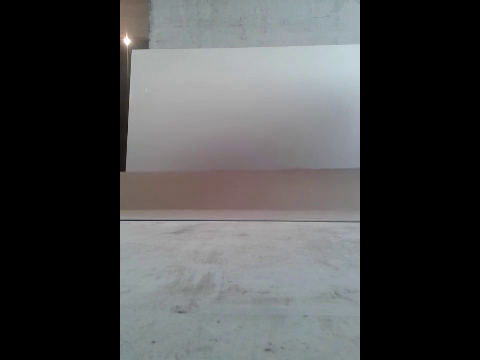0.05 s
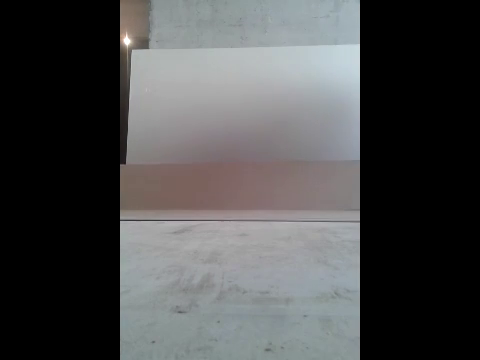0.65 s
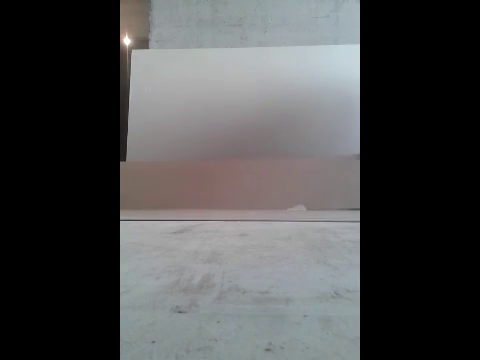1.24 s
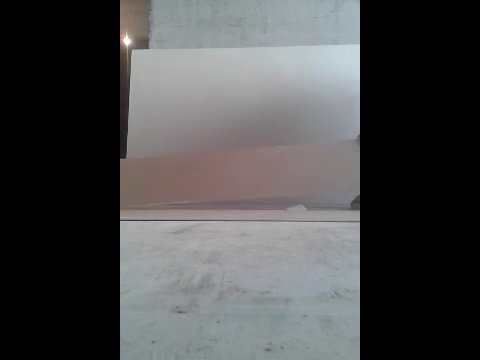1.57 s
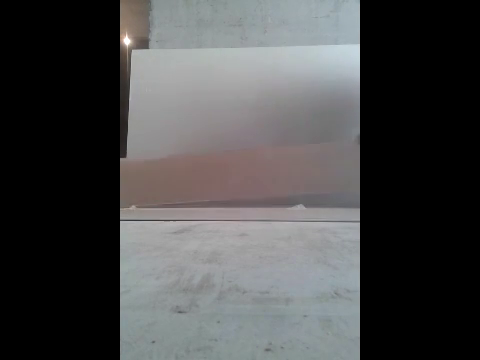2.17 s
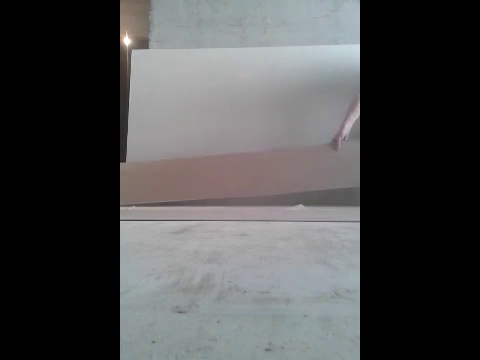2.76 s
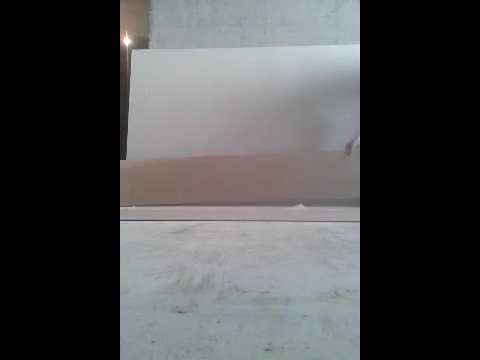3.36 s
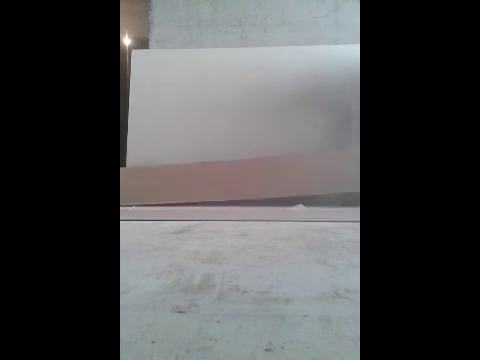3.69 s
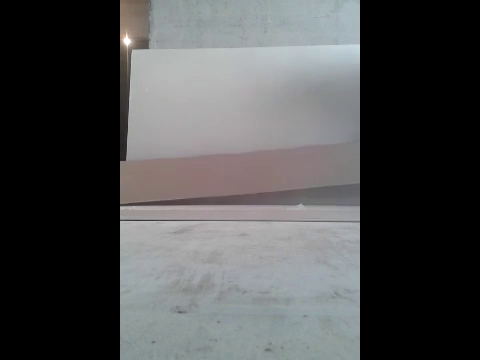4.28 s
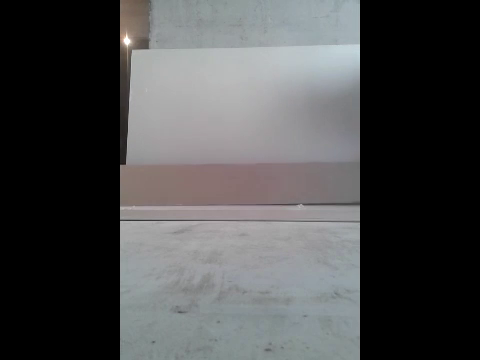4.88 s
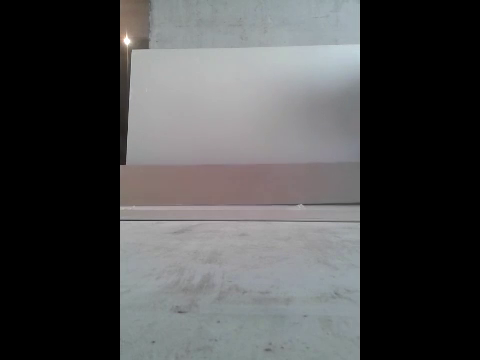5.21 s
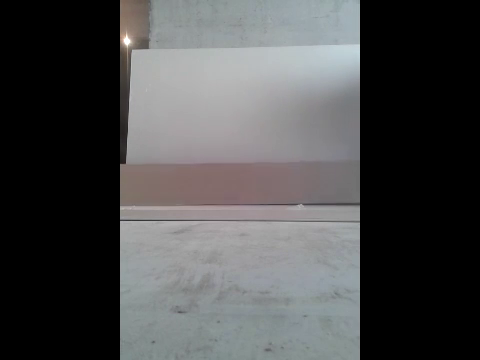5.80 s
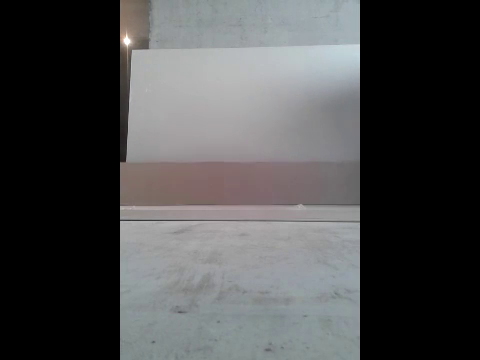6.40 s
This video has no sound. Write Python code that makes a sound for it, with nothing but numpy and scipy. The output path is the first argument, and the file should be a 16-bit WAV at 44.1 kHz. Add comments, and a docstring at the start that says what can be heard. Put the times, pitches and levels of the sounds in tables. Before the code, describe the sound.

A long plasterboard strip is shifted in a bare room, its chalky edge scraping in uneven bursts with crumbly knocks and hollow drumming. One longer, louder drag groans and gives a high squeak. A hand swishes sharply across the paper face, and softer scrapes follow. Finally the strip is pushed against a larger sheet, which booms low, chatters and rattles. The room adds a short echo.

```python
"""A chalky scrape and the swish of a hand on paper: a long plasterboard strip is lifted in a bare room.
Its edge grinds in bursts that ring and drum the strip, and its corners knock and crumble. In one long
drag the bending modes groan and gypsum squeaks on gypsum. At last the strip is pushed home against
a larger sheet, which booms, chatters and rattles as the two stick and slip."""
import sys
import numpy as np
from scipy import signal
from scipy.fft import rfft, irfft
from scipy.io import wavfile
from scipy.ndimage import uniform_filter1d

SR = 44100
rng = np.random.default_rng(int(sys.argv[2]) if len(sys.argv) > 2 else 0)


def inscribe(sig):
    """Save sig as 16-bit PCM at rate SR to the path in sys.argv[1].

    A 1-D sig is mono; a 2-D sig holds one channel per row.
    Samples are clipped to [-1, 1] before scaling.
    """
    pcm = np.round(np.clip(np.atleast_2d(sig).T, -1, 1) * 32767)
    wavfile.write(sys.argv[1], SR, pcm.astype(np.int16))


N = 288414


def undb(db):
    """Decibels to gain."""
    return 10 ** (np.asarray(db) / 20)


def unit(x):
    """Scale to rms 1."""
    return x / np.sqrt(np.mean(x ** 2))


def colour(x, eq):
    """Minimum-phase EQ through (Hz, dB) points; white input keeps its power."""
    size = 4096
    hz, db = np.transpose(eq)
    bins = np.fft.rfftfreq(size, 1 / SR)
    gain = unit(undb(np.interp(np.log(bins + 1), np.log(hz), db)))
    cepstrum = irfft(np.log(gain))
    cepstrum[1:size // 2] *= 2
    cepstrum[size // 2 + 1:] = 0
    return signal.oaconvolve(x, irfft(np.exp(rfft(cepstrum))))[:len(x)]


def resonate(x, hz, width):
    """One resonance, gain 1 at its centre."""
    return signal.lfilter(*signal.iirpeak(min(hz, .45 * SR), hz / width, fs=SR), x)


def modes(x, table, lock):
    """A body's resonances driven together, at rms 1; friction evens out each swing by lock (0-1)."""
    out = 0
    for hz, width, db in table:
        ring = resonate(x, hz, width)
        power = uniform_filter1d(ring ** 2, int(SR / width)).clip(min=0)
        swing = np.sqrt(power) + np.std(ring) / 10
        out = out + undb(db) * unit(ring / swing ** lock)
    return unit(out)


def wander(hz):
    """Smooth random modulation at rms 1."""
    step = max(int(SR / hz), 2)
    held = rng.standard_normal(N)[np.arange(N) // step]
    return unit(uniform_filter1d(uniform_filter1d(held, step), step))


def grit(per_s, spread_db, catch_db, catch_hz):
    """Tiny slips of uneven size, surging where the surface catches and lets go."""
    slips = (rng.random(N) < per_s / SR) * np.sign(rng.standard_normal(N))
    sizes = undb(spread_db * rng.standard_normal(N).clip(-2, 2))
    catching = undb(catch_db * wander(catch_hz).clip(-2, 2))
    return unit(slips * sizes * catching)


def swell(start, hold, rise, fall):
    """Envelope of a move: it rises to full strength at start, holds and dies away."""
    t = np.arange(N) / SR
    return np.exp(-np.maximum((start - t) / rise, (t - start - hold) / fall).clip(0, 20))


def blend(swells, db):
    """Gain of overlapping moves, each at its own level: their powers add."""
    return np.sqrt(undb(db) ** 2 @ swells ** 2)


def strip_low_cut(x):
    """A narrow strip radiates next to nothing below its first mode."""
    return signal.sosfilt(signal.butter(4, 170, "high", fs=SR, output="sos"), x)


def add_tail(x, tail, wet_db):
    """Mix the direct sound with a tail of reflections at about the same total power."""
    response = undb(wet_db) * tail / np.linalg.norm(tail)
    response[0] = 1
    return signal.oaconvolve(x, response / np.linalg.norm(response))[:N]


def scatter(x, wet_db, fade_s):
    """Waves bounce about inside the board for a few ms and ripple its spectrum."""
    t = np.arange(SR // 25) / SR
    bounces = rng.standard_normal(len(t)) * np.exp(-t / fade_s) * (t > .001)
    return add_tail(x, bounces, wet_db)


# EQs for the bright hiss, midrange rasp and fine dust. Each row: frequency in Hz, gain in dB.
HISS_EQ = [(100, -25), (1000, -33.5), (2700, -20), (3500, -16.5), (4500, -8.5), (5200, -2), (5900, 0),
           (6600, 2), (7400, -2.5), (8300, -4.5), (10000, -25.5), (12000, -42), (14000, -32)]
RASP_EQ = [(150, -27.5), (450, -8), (800, -5), (1000, -6.5), (1250, 0.5), (1700, -2.5), (2200, 4),
           (2450, 0.5), (2750, -3), (3200, 1), (5000, 3), (12000, -56)]
DUST_EQ = [(2000, -50), (7000, -19), (9000, 1), (10500, -3), (12000, -12), (14000, -28)]
# The strip's high ring. Each row: frequency in Hz, bandwidth in Hz, level in dB.
RING_MODES = [(1990, 36, 3), (2220, 45, -1), (2900, 55, 0), (3965, 70, 6), (4200, 150, 3), (4480, 70, 1),
              (5150, 110, 10), (5400, 70, 6), (6370, 110, 7), (6550, 70, 5), (6720, 60, 5), (7850, 150, 1)]
# Strokes of the edge. Each row: start of full speed, hold, rise and fall in seconds, hiss level in dB,
# then rasp, dust and ring in dB relative to the hiss, and drumming level in dB.
EDGE_STROKES = [ (0.0, 0.0057, .02, 0.049, -18, -9.5, -14.5, -10, -34.5),
                (0.27, 0.047, 0.034, 0.23, -40.5, -18, -16, -16, -72),
                (0.44, 0.024, 0.0095, 0.11, -24.5, -8.5, -11, -17, -37),
                (0.6, 0.049, 0.01, 0.1, -25.5, -10, -15, -16, -25),
                (0.725, 0.049, 0.039, 0.077, -27, -7.5, -18, -5, -25),
                (0.95, 0.042, .004, 0.053, -35.5, -6.5, -23, 1, -24.5),
                (1.106, 0.1, 0.12, 0.087, -37.5, -15, -9, -21, -39.5),
                (1.244, 0.042, 0.058, 0.057, -37.5, -9, -21, -2.5, -43),
                (1.437, 0.0071, 0.054, 0.094, -41.5, -18.5, -13, -15, -73),
                (1.743, 0.057, .06, .04, -28, -34, -9.5, -18, -78),
                (1.823, 0.1, .039, .05, -14, -7, -14, -10, -45),
                (1.955, 0.13, 0.023, 0.053, -14.5, -9, -17, -7, -40),
                (2.145, .09, 0.052, 0.045, -14.5, -9.5, -17, -3, -41),
                (2.278, 0.041, 0.029, 0.079, -15, -9, -35, -4.5, -34.5),
                (2.574, 0.2, 0.13, 0.14, -20.5, -6, -14.5, -9.5, -38),
                (3.067, 0.013, 0.047, 0.11, -14, -15, -18, -27, -43.5),
                (3.293, 0.14, 0.047, 0.1, -44, -10, -9, -9, -48.5),
                (3.49, 0.023, 0.089, 0.18, -30.5, -12.5, -11.5, -8, -40),
                (3.788, 0.082, 0.037, .05, -27.5, -12, -12, -9, -45),
                (4.019, 0.023, 0.019, 0.073, -28.5, -12.5, -11, -18, -34),
                (4.057, 0.014, .02, 0.058, -38, -5, -21, -11, -33.5),
                (4.5, 0.21, 0.078, 0.088, -39, -17, -11, -20, -77),
                (4.75, 0.084, 0.049, 0.062, -34, -6.5, -28, -1, -60),
                (4.967, 0.4, 0.037, .04, -30, -6, -13.5, -13, -57),
                (5.272, 0.014, 0.017, 0.11, -22, -7, -22, -2, -49),
                (5.689, .08, 0.039, 0.068, -36.5, -7.5, -15.5, -2.5, -55),
                (6.01, 0.025, 0.054, 0.064, -25.5, -5.5, -18, -2, -45),
                (6.24, .02, 0.015, 0.15, -27.5, -24, -25, -5.5, -50),
                (6.387, 0.022, 0.072, 0.057, -34, 2.5, -30, -1, -45)]


def edge_scrape():
    """The chalky edge hisses, rasps under pressure and rings the strip's upper modes."""
    strokes = np.array([swell(*row[:4]) for row in EDGE_STROKES])
    hiss_db, rasp_db, dust_db, ring_db = np.transpose(EDGE_STROKES)[4:8]
    hiss = colour(grit(per_s=8000, spread_db=3.5, catch_db=.4, catch_hz=280), HISS_EQ)
    rasp = colour(grit(per_s=7000, spread_db=2, catch_db=.33, catch_hz=90), RASP_EQ)
    dust = colour(grit(per_s=13000, spread_db=2.5, catch_db=0, catch_hz=200), DUST_EQ)
    ring = modes(grit(per_s=4100, spread_db=2, catch_db=2.5, catch_hz=70), RING_MODES, lock=.043)
    grinding = (blend(strokes, hiss_db) * hiss
                + blend(strokes, hiss_db + rasp_db) * rasp
                + blend(strokes, hiss_db + dust_db) * dust)
    grinding = scatter(grinding, wet_db=-10, fade_s=.006)
    ringing = blend(strokes, hiss_db + ring_db) * ring
    chirp_db = 1.49 * hiss_db - 6  # the chirps grow faster than the hiss
    return strip_low_cut(grinding + ringing + blend(strokes, chirp_db) * grain_chirps())


def grain_chirps(per_s=98, half_length_s=.0039, lowest_hz=6250, span_octaves=.9):
    """Single grains catch and whistle for a few ms, each at its own pitch; high ones are weaker."""
    spread_db, db_per_octave, glide_octaves_per_s = 2.5, -18.5, 6
    t = np.arange(-SR // 50, SR // 50) / SR
    envelope = np.exp(-(t / half_length_s) ** 2)
    out = np.zeros(N + len(t))
    starts = np.flatnonzero(rng.random(N) < per_s / SR)
    octaves = span_octaves * rng.random(N)
    sizes, glides = rng.standard_normal((2, N)).clip(-2, 2)
    for i in starts:
        hz = lowest_hz * 2 ** (octaves[i] + glide_octaves_per_s * glides[i] * t)
        db = spread_db * sizes[i] + db_per_octave * octaves[i]
        out[i:i + len(t)] += undb(db) * envelope * np.sin(2 * np.pi * np.cumsum(hz) / SR)
    return unit(out[:N])


# EQ for the paper face's swish. Each row: frequency in Hz, gain in dB.
PAPER_EQ = [(100, -52), (800, -55), (1300, -13.5), (2800, -13.5), (4500, -41), (4950, 0), (5500, 1.5),
            (6300, 5), (7200, -3), (8300, -12), (10000, -17), (14000, -35)]
# Hand swipes. Each row: peak time in seconds, level in dB, rise and fall in seconds,
# pitch of the hollow under the palm in Hz, its level in dB relative to the swish.
HAND_SWIPES = [(0.005, -23, 0.016, 0.078, 1650, -9.5), (0.285, -39, .025, 0.013, 1700, -29),
               (1.88, -19, 0.026, 0.036, 1770, -4.5), (3.078, -10.5, 0.029, 0.016, 2380, -19),
               (3.129, -11, 0.0075, 0.034, 2410, -26), (3.845, -32.5, 0.042, 0.042, 2210, -7),
               (5.085, -23, 0.032, 0.017, 1990, -9.5)]


def hand_swipes():
    """Paper swishes under a sliding hand; the hollow beneath the palm adds a lower band."""
    out = 0
    fibres = grit(per_s=6000, spread_db=5, catch_db=0, catch_hz=160)
    swish = colour(fibres, PAPER_EQ)
    for peak, db, rise, fall, palm_hz, palm_db in HAND_SWIPES:
        palm = unit(resonate(resonate(fibres, palm_hz, width=210), palm_hz, width=210))
        out = out + undb(db) * swell(peak, 0, rise, fall) * (swish + undb(palm_db) * palm)
    return out


# EQ for the board's dull body, in drumming and thuds. Each row: frequency in Hz, gain in dB.
BODY_EQ = [(40, -13), (90, -10), (140, -7.5), (190, -2), (230, -1), (295, -5), (390, 2), (550, -5.5),
           (750, -10.5), (1000, -10), (3000, -29.5)]
# Hollow tones of the loosely held strip. Each row: frequency in Hz, bandwidth in Hz, level in dB.
DRUM_MODES = [(184, 18, 4), (214, 24, 7.5), (336, 24, 0), (407, 26, -3), (458, 30, -1), (557, 36, 0.5),
              (736, 78, -3)]


def drumming(lag_s=.024, rise_s=.032, fall_s=.059):
    """Coarser bumps drum on the strip, whose heavy low end answers each edge stroke late."""
    strokes = np.array([swell(start + lag_s, hold, rise_s, fall_s) for start, hold, *_ in EDGE_STROKES])
    drum_db = np.transpose(EDGE_STROKES)[-1]
    bumps = colour(grit(per_s=1200, spread_db=1.5, catch_db=-5, catch_hz=40), BODY_EQ)
    drum = undb(-16.5) * bumps + undb(-15) * modes(bumps, DRUM_MODES, lock=1)
    return blend(strokes, drum_db) * drum


# EQ for the crack of gypsum. Each row: frequency in Hz, gain in dB.
CRACK_EQ = [(100, -68), (1000, -9), (2300, -0.5), (3500, -7), (5000, -7.5), (7000, -6.5), (9000, -2.5),
            (11000, -11), (14000, -18)]
# Corner hits. Each row: start in seconds, level in dB, crumble decay in seconds, thud offset in dB.
CORNER_KNOCKS = [(0.3702, -26.5, 0.0048, -27), (0.424, -23, 0.005, -40), (0.4275, -12.5, 0.0087, -30),
                 (0.434, -12.5, 0.0033, -19), (0.4507, -5.5, 0.0007, -18), (0.457, -16, .005, -30),
                 (0.526, -20, 0.0023, -26), (0.575, -16.5, 0.0028, -23), (0.588, -14.5, 0.0031, -18),
                 (0.7147, -21.5, 0.013, -9), (0.96, -22, 0.004, -17), (1.546, -38, 0.012, -25),
                 (1.581, -36.5, 0.015, -32), (1.9555, -16, 0.021, -27), (3.077, -13, .009, -46),
                 (3.209, -15, 0.0024, -30), (3.4908, -22, 0.0023, -22), (3.5115, -20.5, 0.009, -36),
                 (3.599, -28, 0.0066, -4.5), (3.749, -30, 0.012, -10), (3.9927, -30.5, 0.037, -22),
                 (4.489, -16.5, 0.0011, -27), (4.653, -54, .012, 11), (5.278, -20.5, 0.0097, -6),
                 (5.4292, -21.5, 0.0049, -20), (5.912, -35, .016, -4), (6.23, -23.5, 0.031, -15),
                 (6.341, -24, 0.0066, -5)]


def corner_knocks(crumble_hz=6470):
    """Each contact is a dying spray of cracking gypsum over a dull thud of the board."""
    t = np.arange(SR // 5) / SR
    cracks, thuds = np.zeros((2, N + len(t)))
    for start, db, decay, thud_db in CORNER_KNOCKS:
        envelope = np.exp(-t / decay)
        spray = unit(rng.standard_normal(len(t)) * envelope) * np.sqrt(np.mean(envelope ** 2))
        ring = resonate(spray, crumble_hz, width=850)
        i = int(start * SR)
        cracks[i:i + len(t)] += undb(db) * (undb(16) * ring + undb(-26) * spray)
        thuds[i:i + len(t)] += undb(db + thud_db) * spray
    return colour(cracks[:N], CRACK_EQ) + colour(thuds[:N], BODY_EQ)


# Bending modes across the strip. Each row: frequency in Hz, bandwidth in Hz, level in dB.
BENDING_MODES = [(235, 12, 1), (630, 12, 5), (1210, 14, 1.5), (1995, 12, 2.5), (2490, 40, -5),
                 (3030, 40, -4)]
# The groan's fader ride through the long drag. Each row: time in seconds, level in dB.
GROAN_FADER = [(1.7, -100), (1.82, -43), (1.98, -37), (2.23, -27.5), (2.34, -30), (2.46, -43), (3.0, -56),
               (3.3, -110)]


def groan():
    """The long drag bends the strip until the slips lock to its bending modes."""
    level_db = np.interp(np.arange(N) / SR, *np.transpose(GROAN_FADER))
    slips = grit(per_s=4000, spread_db=1, catch_db=-.5, catch_hz=75)
    return undb(level_db) * strip_low_cut(modes(slips, BENDING_MODES, lock=.85))


# Gypsum squeaking on gypsum. Each row: peak time in seconds, level in dB, half-length in seconds,
# pitch in Hz, glide in octaves per second.
GYPSUM_SQUEAKS = [(1.975, -29, 0.015, 6550, -10), (2.018, -12.5, .035, 6800, 0.5),
                  (2.195, -26, .014, 10600, -12), (4.49, -19, .0018, 6100, -12),
                  (4.521, -36, 0.015, 6140, -7), (5.264, -20.5, 0.006, 10200, -8),
                  (5.272, -32, .01, 8700, -16), (5.434, -32.5, .009, 9200, 2),
                  (6.238, -33, 0.01, 10500, -3), (6.255, -27.5, .016, 6350, 2)]


def squeaks():
    """For a moment the slips fall into step: a rough, sliding whistle."""
    t, out = np.arange(N) / SR, np.zeros(N)
    waver, roughness = 1 + .018 * wander(900), wander(600)
    for peak, db, half_length, hz, glide in GYPSUM_SQUEAKS:
        near = np.abs(t - peak) < 3 * half_length
        from_peak = t[near] - peak
        phase = 2 * np.pi * np.cumsum(hz * 2 ** (glide * from_peak) * waver[near]) / SR
        out[near] += undb(db) * np.exp(-(from_peak / half_length) ** 2) * np.sin(phase)
    return out * roughness


# The big sheet's low rumble, its harder chatter and the rattle on top.
# Each row: frequency in Hz, bandwidth in Hz, level in dB.
RUMBLE_MODES = [(68, 4, -16), (89, 6, -12), (156, 5, -1), (195, 12, -5), (215, 12, 4), (235, 12, -5),
                (260, 16, 0), (293, 12, 3.5)]
CHATTER_MODES = [(354, 14, 3), (389, 16, 2), (415, 22, -5), (445, 25, -8), (500, 30, -5), (548, 16, -10)]
RATTLE_MODES = [(588, 12, 6), (630, 14, 13), (678, 28, 8), (748, 36, 8), (880, 170, 4), (1160, 160, 7)]
# Pushes on the sheet. Each row: start of full force and hold in seconds, then boom, rumble and
# chatter levels in dB.
SHEET_PUSHES = [(4.739, 0.12, -34.5, -40, -37.5), (4.974, .07, -37.5, -40, -39.5),
                (5.227, 0.042, -51, -27.5, -40), (5.319, 0.025, -41, -41, -29.5),
                (5.437, 0.072, -42.5, -36.5, -56), (5.61, 0.014, -53, -48, -48.5),
                (5.713, .06, -48, -47.5, -47.5), (5.94, .01, -53, -41, -45.5),
                (6.023, 0.067, -37, -39.5, -39), (6.268, 0.061, -33, -36, -38.5),
                (6.377, 0.06, -31.5, -30.5, -19), (6.496, .03, -42, -31, -23.5)]


def big_sheet(boom_hz=109.3, rise_s=.028, fall_s=.086):
    """The strip sticks and slips on the big sheet, which booms and, pushed hard, chatters and rattles."""
    pushes = np.array([swell(start, hold, rise_s, fall_s) for start, hold, *_ in SHEET_PUSHES])
    boom_db, rumble_db, chatter_db = np.transpose(SHEET_PUSHES)[2:]
    rattle_db = 1.06 * chatter_db - 8.5  # grows faster than the chatter that sets it off
    slips = grit(per_s=600, spread_db=3, catch_db=-2, catch_hz=77)
    drive = colour(slips, eq=[(30, -47), (85, 8), (1200, -18), (3000, -24)])
    # the slipping locks to one low mode, so the boom is almost a tone
    wavering_hz = boom_hz * (1 + .01 * wander(25))
    boom = unit(np.sin(2 * np.pi * np.cumsum(wavering_hz) / SR) * undb(1.5 * wander(27)))
    return (blend(pushes, boom_db) * boom
            + blend(pushes, rumble_db) * modes(drive, RUMBLE_MODES, lock=1)
            + blend(pushes, chatter_db) * modes(drive, CHATTER_MODES, lock=.19)
            + blend(pushes, rattle_db) * modes(drive, RATTLE_MODES, lock=.42))


# The bare room's reverb. Each row: frequency in Hz, time to fall 60 dB in seconds.
REVERB_TIMES = [(200, 0.67), (1500, 0.67), (5000, 0.55), (8000, 0.057), (13000, 0.51)]


def room(x, wet_db):
    """Bare walls return a dense tail whose treble dies first."""
    t = np.arange(SR) / SR
    hz, decays = np.transpose(REVERB_TIMES)
    spectrum, bins = rfft(rng.standard_normal(SR)), np.fft.rfftfreq(SR, 1 / SR)
    tail = 0
    for band_weights, t60 in zip(np.eye(len(hz)), decays):
        band = irfft(spectrum * np.interp(bins, hz, band_weights), SR)
        tail = tail + band * undb(-60 * t / t60)
    fade_in = np.clip(t / .0049 - .4, 0, 1)
    return add_tail(x, tail * fade_in, wet_db)


# EQ for the room tone. Each row: frequency in Hz, gain in dB.
ROOM_TONE_EQ = [(30, 8), (120, 16.5), (500, -76), (900, 2), (2000, -3), (3000, -57), (6500, 19), (10000, 4),
                (14000, 0)]


def scene():
    """Boards and hands in the room over a faint steady room tone, alike in both channels."""
    room_tone = undb(-56) * colour(rng.standard_normal(N), ROOM_TONE_EQ)
    scrapes = room(edge_scrape() + squeaks(), wet_db=-8)
    knocks = room(corner_knocks(), wet_db=2)
    hands = room(hand_swipes(), wet_db=-4.5)
    # the low drumming, groan and boom, with only a little room reverb
    lows = room(drumming() + groan() + big_sheet(), wet_db=-8)
    mono = scrapes + knocks + hands + lows + room_tone
    return np.array([mono, mono])


def record(dry):
    """A soft clip rounds the tallest peaks and a steep low-pass cuts the top."""
    ceiling, top_hz = .85, 14100
    rounded = dry / (1 + (np.abs(dry) / ceiling) ** 6) ** (1 / 6)
    return signal.sosfilt(signal.ellip(10, .2, 80, top_hz, fs=SR, output="sos"), rounded)


dry = scene()
out = record(dry)
inscribe(out)
```